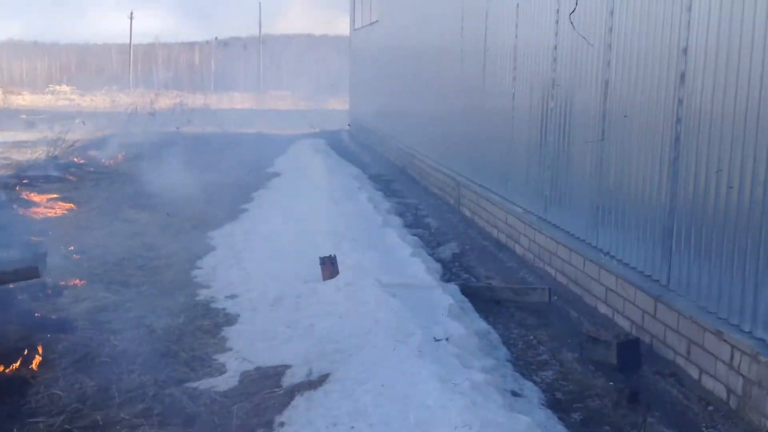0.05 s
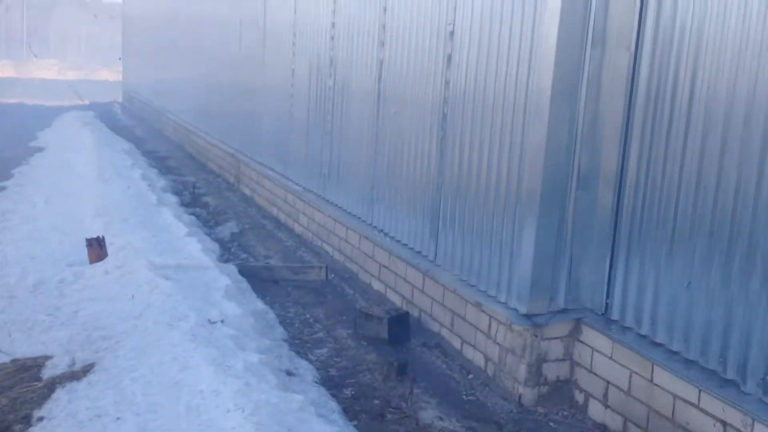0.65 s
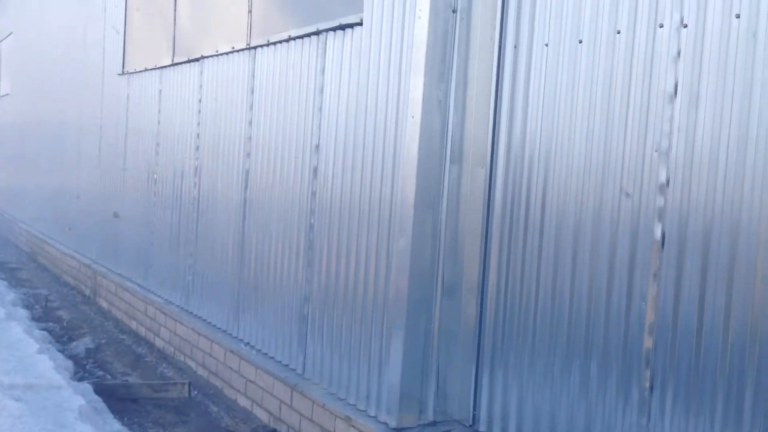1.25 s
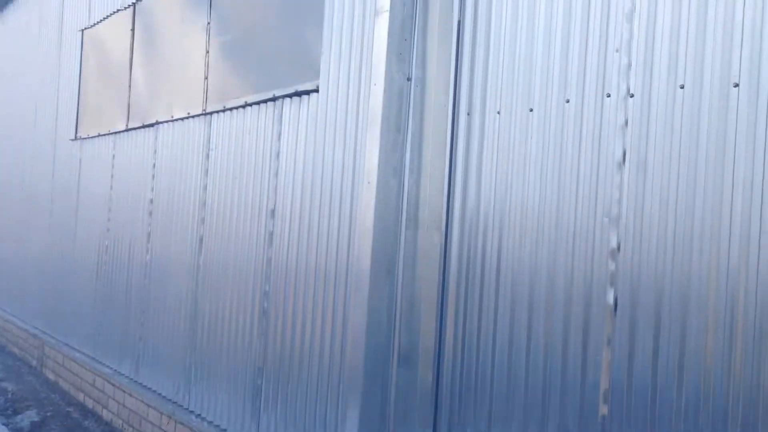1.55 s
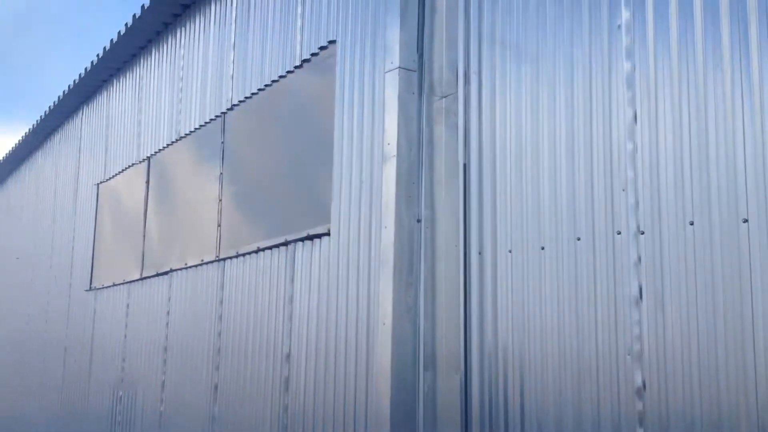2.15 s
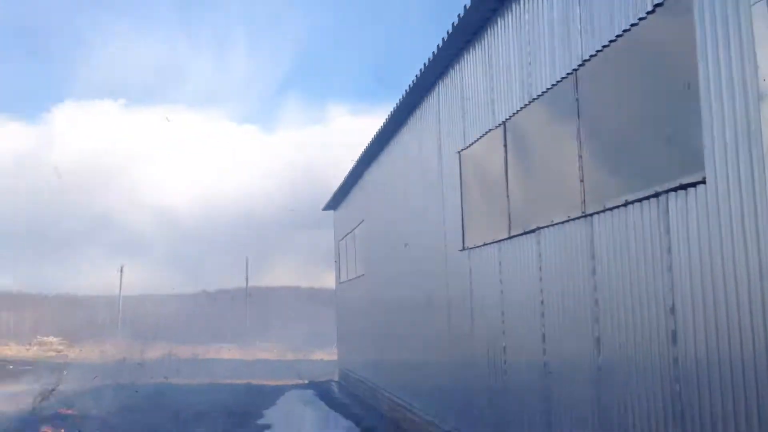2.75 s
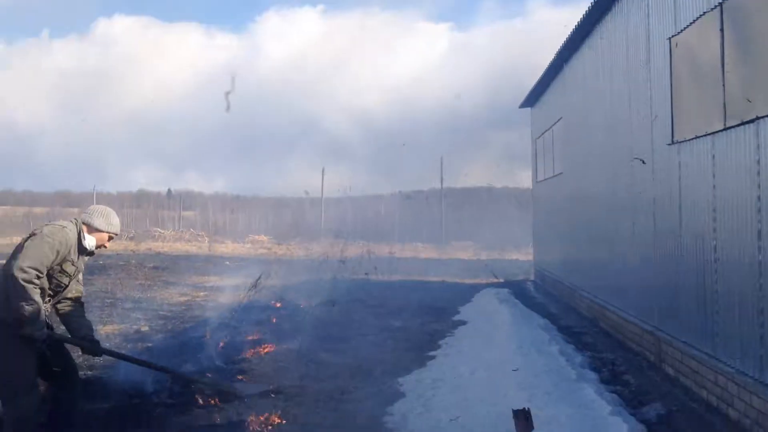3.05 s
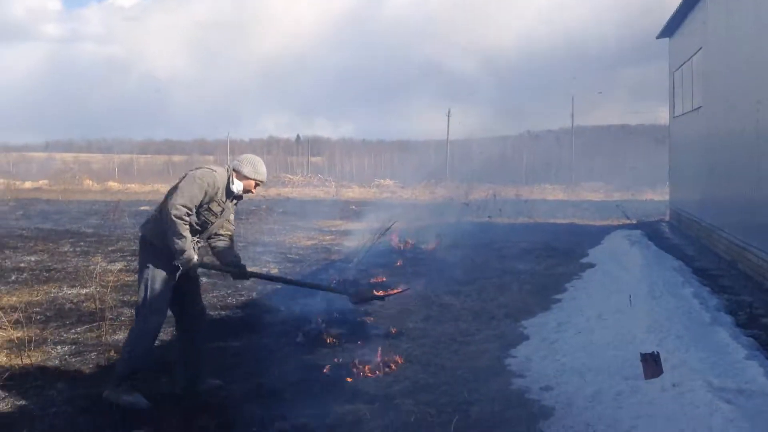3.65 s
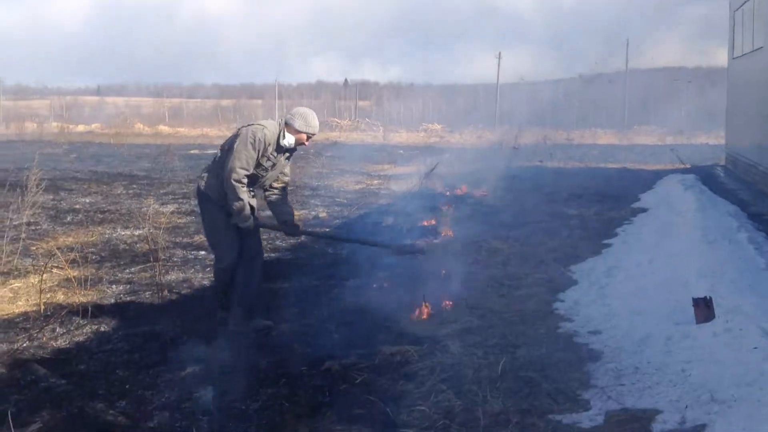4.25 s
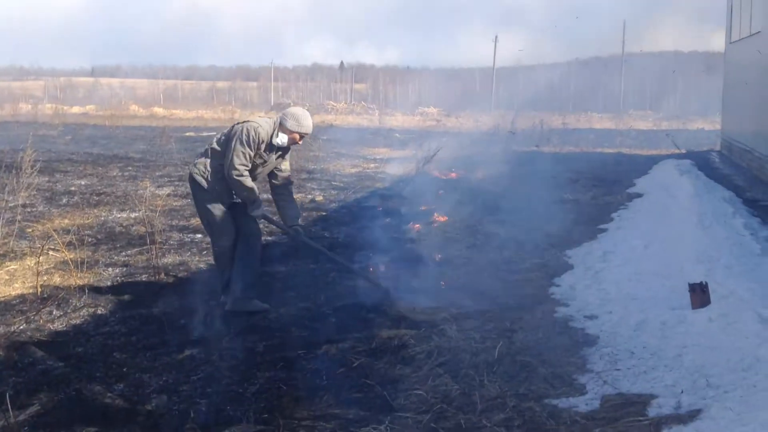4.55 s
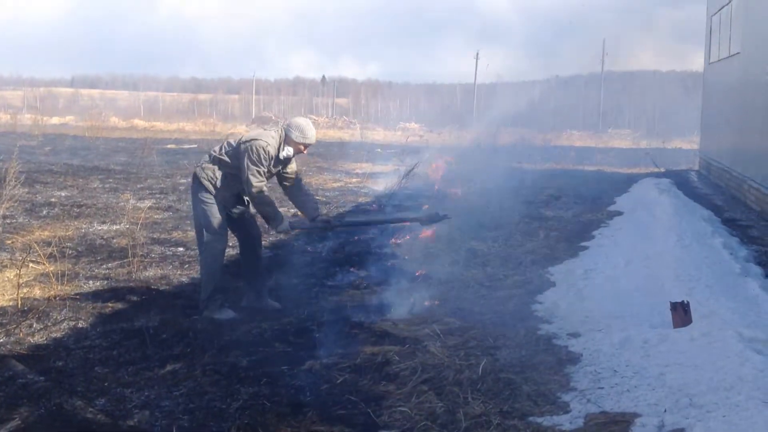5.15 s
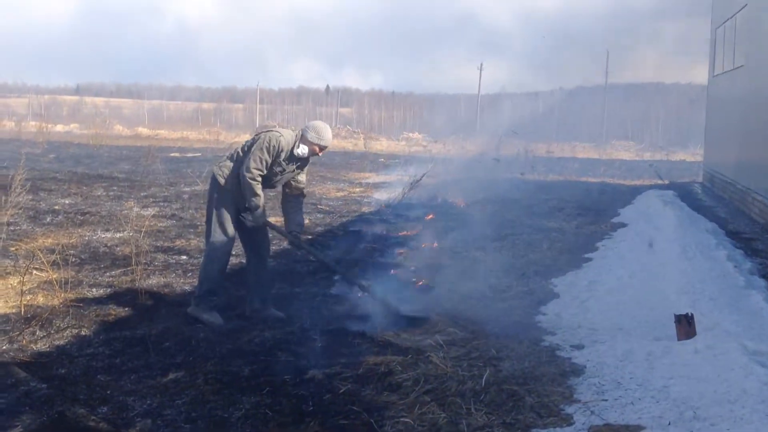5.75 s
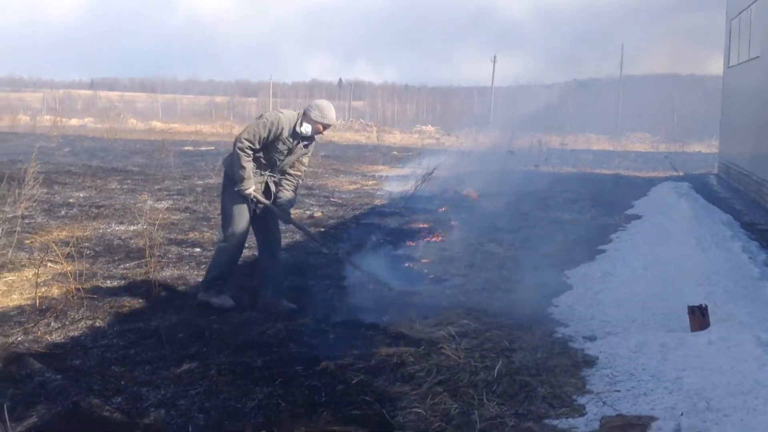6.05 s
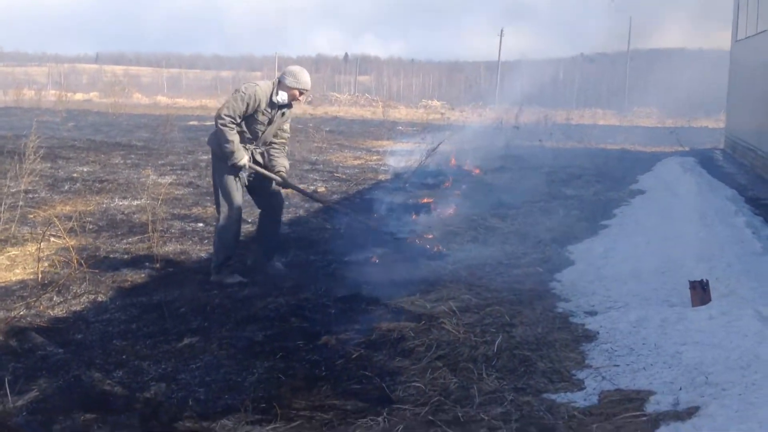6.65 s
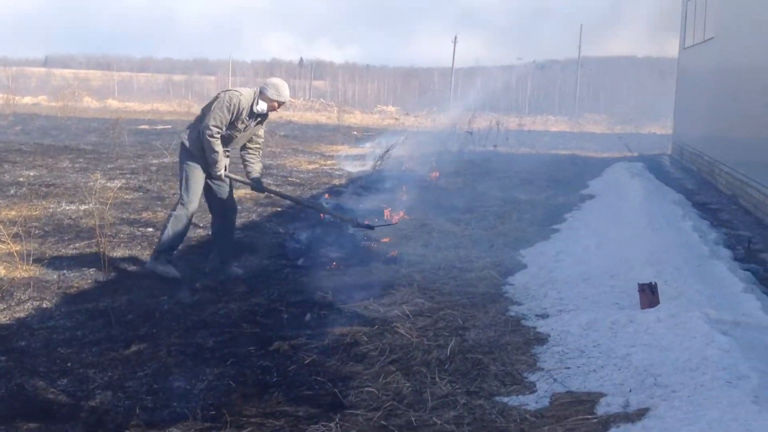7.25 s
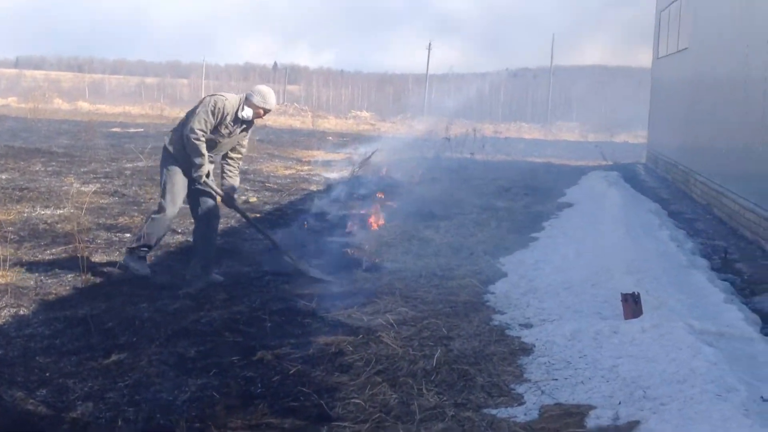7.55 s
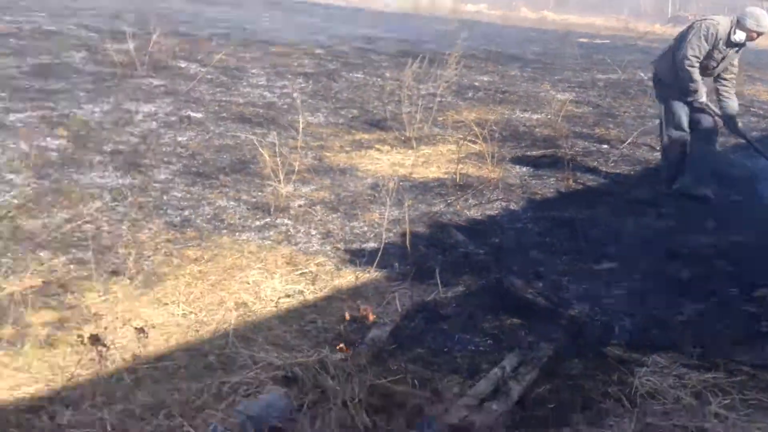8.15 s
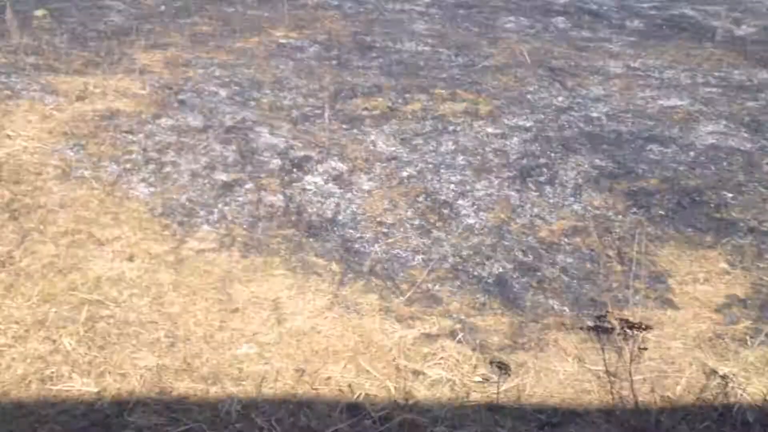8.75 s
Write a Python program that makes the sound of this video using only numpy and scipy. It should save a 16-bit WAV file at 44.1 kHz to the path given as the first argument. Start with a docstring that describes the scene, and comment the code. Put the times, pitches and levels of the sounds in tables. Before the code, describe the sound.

A shovel repeatedly slaps and crunches dry grass outdoors while a small fire crackles and wind rumbles on the microphone.

```python
"""A shovel beats out a grass fire, a few metres away beside a sheet-metal shed.
Each stroke crushes dry stalks, slaps the ground and throws up grit; the steel blade rings,
and the shed wall and the yard echo. The burning grass fizzes as countless thin stems crack,
thicker stems burst with a pop, and gusts of wind rumble on the microphone."""
import sys
import numpy as np
from scipy import signal
from scipy.fft import rfft, irfft
from scipy.io import wavfile
from scipy.ndimage import uniform_filter1d

SR = 44100
rng = np.random.default_rng(int(sys.argv[2]) if len(sys.argv) > 2 else 0)


def to_wav(sig):
    """Store sig (one row per channel, or 1-D mono) as 16-bit WAV at the path in sys.argv[1].

    Samples outside -1..1 are clipped; the rate is SR.
    """
    pcm = np.clip(np.atleast_2d(sig), -1, 1) * 32767
    pcm = np.round(pcm).astype(np.int16)
    wavfile.write(sys.argv[1], SR, pcm.T)  # frames by channels


N = 393372
T = np.arange(N) / SR
EVENT_T = T[:SR * 3 // 5]  # the 0.6 s clock of a single event

# shovel strokes: t/s, slap/dB, thud/dB, note of the trapped air/Hz, grit/dB, leaves/dB, stalks/dB,
# time to pass through the grass/s, time pressed down/s
STROKES = [(.250, -13.5, -28.5, 803, -42, -28.5, -36, 0.015, 0.0033),
           (.700, -19.5, -19, 648, -42.5, -35, -37.5, 0.018, 0.017),
           (1.688, -26.5, -20.5, 860, -38.5, -31, -34, 0.0095, 0.0062),
           (1.965, -22, -23.5, 977, -48, -29, -26, 0.0042, 0.012),
           (2.530, -15.5, -27, 708, -46, -37, -34.5, .010, .014),
           (2.754, -29, -28, 848, -57, -40.5, -43.5, 0.019, 0.016),
           (3.387, -30, -37, 810, -61, -39, -28, 0.045, 0.006),
           (4.045, -20, -22.5, 529, -42.5, -33, -34, 0.014, 0.0032),
           (4.631, -17, -31, 1483, -48, -34.5, -36, 0.017, 0.0032),
           (5.410, -19.5, -25.5, 894, -46.5, -38.5, -36.5, 0.017, 0.015),
           (5.921, -25, -30, 813, -46.5, -37.5, -39, 0.026, 0.004),
           (6.423, -27, -33, 1200, -51.5, -50, -64, 0.016, 0.0077),
           (6.557, -38, -55, 1160, -54, -51, -49.5, 0.063, 0.016),
           (7.133, -24.5, -34, 1378, -43.5, -51, -46.5, 0.028, .014),
           (7.624, -54, -35, 900, -53.5, -39.5, -38.5, .011, 0.0082),
           (8.179, -39.5, -42, 1095, -57, -43, -44, .007, .005),
           (8.618, -36, -42, 1457, -48, -40.5, -41.5, 0.0087, 0.0076)]
# tone colours of a stem's bright tick and of its woody snap: f/Hz, level/dB
TICK_COLOUR = [(300, -1.5), (1500, 1.5), (3500, -17.5), (6000, 5), (7500, -1.5), (10000, -3.5), (12700, -2),
               (14000, 2), (15200, -2)]
SNAP_COLOUR = [(150, -36), (500, -4), (1300, -4), (2200, 1), (3500, -5.5), (6000, -12.5), (15000, -21)]


def shovel_slaps(slap_t60=0.14, thud_t60=0.14, air_t60=0.083, soil_t60=0.46):
    """The blade hits uneven soil in a quick run of contacts; it rings, the ground thuds, grit flies."""
    # the blade's notes, on the soil and lifted: f/Hz, level/dB, t60/s (time to fade by 60 dB)
    damped_notes = [(150, 8, 0.12), (304, -4, 0.3), (544, -2, 0.11), (710, 6.5, 0.14), (802, 7, 0.077),
                    (1090, -19, 0.19), (1215, -11, 0.22), (1396, 10, 0.088), (1578, 6, 0.35),
                    (1810, 2, 0.29), (2027, 16.5, 0.033), (2200, -2, 0.071), (2590, -8, .11)]
    free_notes = [(1475, -3.5, 0.79), (1440, -10, .5), (1500, -2, 0.62), (1790, -6.5, 0.86), (1810, 2, 0.4),
                  (1870, 8, 0.26), (1910, -5, 0.38), (2310, -15, 0.29)]
    # the blade springs off the ground and rings on: t/s, level/dB
    rebounds = [(1.715, -35.5), (2.557, -37.5), (5.438, -45), (7.161, -39)]
    # tone colours of steel on soil, the ground and the flying grit: f/Hz, level/dB
    slap_colour = [(60, -46), (150, -2.5), (300, 1.5), (430, -3.5), (720, 2), (1000, -2.5), (1450, -1.5),
                   (2100, -9), (2900, -14.5), (3700, -24), (8000, -57), (15000, -37)]
    thud_colour = [(30, -33), (70, -41), (125, -1), (220, 1), (330, -0.5), (500, -15), (1200, -10),
                   (5000, -75)]
    grit_colour = [(100, -17), (400, 7), (900, -2.5), (1500, 4), (2000, -3), (3000, -12.5), (4000, -13.5),
                   (6000, -13.5), (8000, -22), (15000, -18)]
    contact, ground, thrown, tones, claps = np.zeros((5, N))
    pressing = np.minimum(EVENT_T / 0.0065, 1)
    lifting = np.minimum(EVENT_T / 0.01, 1)
    on_soil = pressing * envelope(swell=0, hold=0, t60=soil_t60)
    for s, slap_db, thud_db, air_hz, grit_db, *_ in STROKES:
        longer = (920 / air_hz) ** 0.54  # a deeper hollow sounds lower and lasts longer
        add(contact, s, undb(slap_db) * envelope(swell=0.0065, hold=0.0072, t60=longer * slap_t60))
        add(claps, s, undb(slap_db + 4) * air_clap())
        add(ground, s, undb(thud_db) * envelope(swell=0.0013, hold=0.0017, t60=longer * thud_t60))
        add(thrown, s, undb(grit_db) * envelope(swell=0.031, hold=0.05, t60=0.37))
        add(tones, s, undb(slap_db - 3) * on_soil * blade_ring(damped_notes))
        # air caught under the curved blade gives each landing its own hollow note
        add(tones, s, undb(slap_db - 1) * pressing * ping(air_hz, longer * air_t60))
    for s, db in rebounds:
        add(tones, s, undb(db) * lifting * blade_ring(free_notes))
    slap = undb(-6) * colour(contact * grains(per_s=2500, spread_db=1), slap_colour)
    thud = colour(ground * grains(per_s=1500, spread_db=0), thud_colour)
    grit = colour(thrown * splinters(per_s=6000, spread_db=0), grit_colour)
    return claps + slap + thud + grit + tones


def blade_ring(notes, detune=0.01345):
    """The steel rings with several fading notes; each landing shifts their pitch a little."""
    hz, db, t60 = np.transpose(notes)[:, :, None]
    shift, phase = rng.standard_normal((len(notes), 2)).T[:, :, None]
    gain = undb(db)
    waves = np.sin(2 * np.pi * (hz * (1 + detune * shift) * EVENT_T + phase))
    fade = np.exp(-np.log(1000) * EVENT_T / t60)
    return np.sum(gain * waves * fade, axis=0) / np.sqrt(np.sum(gain ** 2) / 2)


def air_clap(width_s=0.000214, bounce_s=0.0034, bounce_db=-3, count=4):
    """Air squeezed out as the blade lands: a sharp pulse, repeated more weakly as the blade chatters."""
    gaps = bounce_s * rng.uniform(0.8, 1.2, count)
    pulses = 0
    for k, s in enumerate(np.cumsum(gaps) - gaps[0] + 5 * width_s):
        offset = (EVENT_T - s) / width_s
        pulses = pulses + undb(k * bounce_db) * (offset ** 2 - 1) * np.exp(-offset ** 2 / 2)
    return pulses


def grass_crunch(twig_db=-7, mass_db=-1, bend_s=0.0021):
    """Dry grass breaks under the load: leaves hiss, stalks rasp, stubble crunches, twigs stand out."""
    # tone colours of the three parts of the grass: f/Hz, level/dB
    leaf_colour = [(1000, -24), (4000, 4), (6500, -31), (7600, -4.5), (9500, -1), (12300, 9), (14000, 2.5),
                   (15300, -14)]
    stalk_colour = [(400, -16), (2000, 3), (3500, -11), (4800, 0), (6200, 4.5), (7300, -12.5), (9500, -9.5),
                    (15000, -12.5)]
    stubble_colour = [(100, -18), (300, 4), (700, -4), (1400, -0.5), (2000, 0), (2750, -2), (3500, -26.5),
                      (6000, -6.5), (15000, -34)]
    leaves, stalks, stubble = np.zeros((3, N))
    for s, swell, hold, leaf_db, stalk_db, stubble_db in grass_touches():
        t60 = 0.093 + 4.9 * hold  # grass pressed for longer takes longer to settle
        load = envelope(swell, hold, t60)
        # the tall leaves are met first, so their sound builds up sooner
        add(leaves, s, undb(leaf_db) * envelope(0.71 * swell, hold, t60))
        add(stalks, s, undb(stalk_db) * load)
        # the low, thick stubble bends before it gives way
        add(stubble, s, undb(stubble_db) * load * np.minimum(EVENT_T / (swell + bend_s), 1))
    mass = undb(mass_db) * splinters(per_s=16000, spread_db=1.5)
    twigs = undb(twig_db) * splinters(per_s=1600, spread_db=3.5)
    hiss = colour(leaves * grains(per_s=11000, spread_db=5), leaf_colour)
    rasp = ground_bounce(colour(stalks * (mass + twigs), stalk_colour))
    crunch = colour(stubble * grains(per_s=4000, spread_db=2.5), stubble_colour)
    return hiss + rasp + crunch


def grass_touches(rustle_swell_s=0.0033):
    """Every touch of the grass: t/s, swell/s, hold/s, leaves/dB, stalks/dB, stubble/dB."""
    # a boot or the dragged blade brushes the grass: t/s, level/dB, time pressed down/s
    rustles = [(0.468, -53, 0.0045), (.507, -47.5, .010), (2.131, -38, 0.0095), (2.628, -45.5, 0.032),
               (4.883, -58, 0.041), (5.619, -47, 0.019), (6.158, -51.5, 0.024), (6.368, -46, 0.027),
               (7.183, -48, 0.0064)]
    for s, slap_db, _, _, _, leaf_db, stalk_db, passing_s, press_s in STROKES:
        stubble_db = max(stalk_db + 4, slap_db - 15.5)  # it breaks with the stalks or under the slap
        yield s - passing_s, 0.94 * passing_s, press_s, leaf_db, stalk_db, stubble_db
    for s, db, press_s in rustles:
        yield s, rustle_swell_s, press_s, db - 6, db, db - 3.5


def ground_bounce(x, lag_s=0.000888, wander=0.22, bounce_db=-5):
    """An echo off the soil; its delay shifts as the blade moves, for a hollow, sliding sound."""
    delay_s = lag_s * np.exp(wander * drift(12))
    echo = np.interp(T - delay_s, T, x)
    return (x + undb(bounce_db) * echo) / np.sqrt(1 + undb(bounce_db) ** 2)


def stem_pops(ring_t60=0.0059, middle_hz=5000):
    """Burning stems split with a tick, a snap and a short ring, longer in the thick, low ones."""
    # the loudest stems that burst: t/s, crack/dB, f/Hz, ring/dB
    loud_pops = [(.073, -33, 13300, -29), (.108, -38, 13500, -33), (.466, -28, 13300, -31),
                 (.864, -33, 6600, -36), (1.094, -48, 5730, -31), (3.336, -32, 5200, -39),
                 (3.521, -36, 12800, -31), (3.721, -28.5, 14400, -35), (4.165, -25, 12600, -29),
                 (4.228, -36, 2320, -37), (4.986, -38, 1540, -33.5), (5.174, -35, 5970, -32),
                 (5.361, -32.5, 12600, -37), (5.620, -30, 5300, -30), (5.631, -43, 5840, -26),
                 (5.849, -29, 12300, -41), (6.009, -29, 13000, -23), (6.086, -41, 4000, -37),
                 (6.168, -50, 6200, -27.5), (6.339, -40, 7300, -44), (6.361, -16.5, 4000, -46),
                 (6.374, -30, 5050, -26), (6.561, -29, 2740, -30), (6.752, -29.5, 12700, -25),
                 (6.813, -42, 2100, -41), (6.863, -35, 13000, -40), (7.006, -39, 2220, -34),
                 (7.020, -34, 12800, -42), (7.070, -34.5, 2110, -35), (7.095, -30, 12400, -40),
                 (7.651, -24, 1460, -21), (7.876, -27.5, 1450, -31), (7.956, -29, 2060, -30.5),
                 (8.030, -36, 2200, -53), (8.073, -29.5, 1290, -32), (8.235, -33, 5500, -28.5),
                 (8.443, -33, 2120, -47), (8.494, -33, 12100, -33), (8.562, -37, 12700, -26),
                 (8.613, -39, 10700, -18.5), (8.865, -31, 10900, -20.5)]
    out = np.zeros(N)
    for s, db, hz, ring_db in loud_pops + small_pops():
        thinness = np.log2(hz / middle_hz)  # in octaves: thin stems tick, thick ones snap
        tick = undb(db - 1.5 + 0.7 * thinness) * crack(TICK_COLOUR, scatter=0.28, t60=0.027)
        snap = undb(db - 2.5 - 4 * thinness) * crack(SNAP_COLOUR, scatter=0.18, t60=0.014)
        ring = undb(ring_db) * ping(hz, ring_t60 * np.sqrt(middle_hz / hz))
        add(out, s, tick + snap + ring)
    return out


def small_pops(per_s=4, quietest_db=-46, spread_db=2.5, thinnest_hz=13500, octaves=2.8):
    """Lesser stems, mostly thin ones, burst at random: t/s, crack/dB, f/Hz, ring/dB."""
    when, size, thickness = rng.random((int(per_s * N / SR), 3)).T
    db = quietest_db - spread_db * np.log(np.maximum(size, np.exp(-2)))
    hz = thinnest_hz / 2 ** (octaves * thickness ** 2)
    return list(zip(when * T[-1], db, hz, db + 3))


def crack(tone_colour, scatter, t60):
    """One sharp crack, scattered among the stems; its peak is 1."""
    push = scatter * rng.standard_normal(len(EVENT_T)) * envelope(swell=0, hold=0, t60=t60)
    push[0] = 1
    sound = colour(push, tone_colour)
    return sound / np.max(np.abs(sound))


def fire(fizz_db=1, tick_db=-10, crack_db=-8, woody_db=-1, flare_db=2):
    """Countless thin blades of grass fizz in the flames, with flurries of ticks and small cracks."""
    # how strongly the grass burns: t/s, level/dB
    burn_levels = [(0, -53.5), (.3, -54), (1.04, -58), (2, -54.5), (2.55, -56), (3.7, -56.5), (4.17, -53.5),
                   (4.6, -57), (4.85, -54.5), (5.35, -58.5), (6.04, -53.5), (6.25, -56.5), (7.03, -54),
                   (7.22, -57), (7.77, -53), (8.1, -56), (8.7, -50.5), (8.92, -53)]
    # tone colour of the fizz: f/Hz, level/dB
    fizz_colour = [(290, -35), (500, 2), (927, -1.5), (1530, -1), (1880, 1), (3580, -7), (5750, -3.5),
                   (6450, -3), (7130, -8.5), (10100, -10.5), (11600, -6.5), (13000, -6), (14600, -12),
                   (15500, -9)]
    strength = undb(np.interp(T, *np.transpose(burn_levels)) + 0.18 * drift(7.5))
    flurry = undb(flare_db * drift(16))
    fizz = undb(fizz_db) * colour(splinters(per_s=16000, spread_db=3), fizz_colour)
    ticks = undb(tick_db) * splinters(per_s=700, spread_db=2.5)
    cracks = undb(crack_db) * grains(per_s=55, spread_db=3)
    # a thicker stem gives its tick and its woody snap at the same instant
    crackle = colour(ticks + cracks / 2, TICK_COLOUR) + undb(woody_db) * colour(cracks, SNAP_COLOUR)
    return strength * (fizz + flurry * crackle)


def wind(rumble_db=-3, flutter_db=2, hard_db=-7, strong_db=-33):
    """Air swirls at the microphone; stronger wind makes smaller swirls that sound higher."""
    # tone colours of soft and hard swirls: f/Hz, level/dB
    soft_colour = [(25, -55), (50, -24), (80, -14), (125, -1.5), (180, 2), (280, -4.5), (400, -9.5),
                   (600, -26), (1200, -61), (5000, -79)]
    hard_colour = [(30, -36), (80, -33.5), (150, 8.5), (280, 0.5), (450, -12.5), (650, -17), (1000, -33.5),
                   (4000, -55)]
    # the hardest swirls that hit the microphone: t/s, level/dB, length/s
    buffets = [(0.036, -38, 0.014), (0.107, -32, 0.023), (0.153, -31.5, .065), (0.186, -31, 0.018),
               (0.64, -44, 0.015), (2.101, -38.5, 0.021), (2.368, -24, 0.028), (2.422, -35, 0.023),
               (2.865, -30, .024), (2.97, -28.5, 0.021), (3.082, -37.5, .017), (3.616, -34.5, .022),
               (3.637, -37, 0.03), (3.673, -35.5, 0.016), (7.49, -40, 0.016), (7.55, -35.5, 0.02),
               (7.936, -36.5, 0.015), (8.709, -36, 0.023)]
    flow_db = wind_level() + flutter_db * drift(45)
    rumble = undb(flow_db + rumble_db) * colour(rng.standard_normal(N), soft_colour)
    swirls = colour(rng.standard_normal(N), hard_colour)
    calm_db = 0.5 * np.minimum(flow_db - strong_db, 0)  # hard swirls fade faster as the wind drops
    out = rumble + undb(flow_db + hard_db + calm_db) * swirls
    for s, db, length in buffets:
        inside = np.abs(T - s) < length / 2
        add(out, s - length / 2, undb(db) * unit(swirls[inside] * np.hanning(inside.sum())))
    return out


def wind_level(breeze_db=-51.5, wander_db=2):
    """The wind's level in dB: gusts swell and fade over a light, wandering breeze."""
    # gusts at their peak: t/s, level/dB, half length/s
    gusts = [(0.146, -32.5, 0.042), (0.388, -37.5, 0.1), (.73, -41, 0.082), (1.146, -50.5, .04),
             (1.614, -41, 0.08), (1.797, -39, .11), (2.189, -31.5, 0.055), (2.41, -32, 0.12),
             (2.81, -33.5, 0.2), (3.65, -38, 0.065), (4.415, -49.5, 0.08), (4.983, -46.5, 0.015),
             (6.02, -53.5, 0.042), (6.39, -44.5, .035), (7.52, -42, 0.066), (7.77, -42, 0.032),
             (8.52, -40.5, 0.045), (8.685, -37.5, 0.099)]
    power = undb(breeze_db + wander_db * drift(8.8)) ** 2
    for s, db, half in gusts:
        power = power + (undb(db) * np.exp(-((T - s) / half) ** 2 / 2)) ** 2
    return 10 * np.log10(power)


def yard_echo(x, wall_s=0.011, wall_db=-18, tail_t60=0.99, tail_db=-28, dull_hz=5000):
    """The shed wall sends back a quick echo, and the yard adds a faint, dull tail."""
    tail = rng.standard_normal(len(EVENT_T)) * envelope(swell=0.093, hold=0, t60=tail_t60)
    tail /= np.sqrt(np.sum(tail ** 2))
    tail = signal.sosfilt(signal.butter(1, dull_hz, fs=SR, output="sos"), tail)
    out = x + undb(tail_db) * signal.fftconvolve(x, tail)[:N]
    add(out, wall_s, undb(wall_db) * x)
    return out


def grains(per_s, spread_db):
    """Tiny breaks click at random moments; more spread makes a few stand out."""
    when, rarity, side = rng.random((int(per_s * N / SR), 3)).T
    size = undb(-spread_db * np.log(np.maximum(rarity, np.exp(-5)))) * np.sign(side - 0.5)
    return unit(np.bincount((when * N).astype(int), size, N))


def splinters(per_s, spread_db):
    """Stems of every thickness break, each ringing briefly in its own range of pitch."""
    edges_hz = [250, 900, 1700, 2700, 4000, 5200, 6400, 8000, 10000, 12000, 13600, 15500]
    bands = [signal.butter(2, pair, "bandpass", fs=SR, output="sos")
             for pair in zip(edges_hz, edges_hz[1:])]
    return unit(sum(signal.sosfilt(band, grains(per_s / len(bands), spread_db)) for band in bands))


def ping(hz, t60):
    """One fading note."""
    return np.sin(2 * np.pi * hz * EVENT_T) * np.exp(-np.log(1000) * EVENT_T / t60)


def envelope(swell, hold, t60):
    """Swell, stay, then die away; all times in seconds."""
    rise = np.minimum(EVENT_T / max(swell, 1 / SR), 1) ** 2
    return rise * np.exp(-np.log(1000) * np.maximum(EVENT_T - swell - hold, 0) / t60)


def colour(x, points, size=4096):
    """Give x a tone colour (f/Hz, level/dB); only the differences between the levels count."""
    hz, db = np.transpose(points)
    bins_hz = np.maximum(np.arange(size // 2 + 1) * SR / size, 1)
    gain = undb(np.interp(np.log(bins_hz), np.log(hz), db))
    # folding the cepstrum makes the filter ring only after a hit, never before it
    cepstrum = irfft(np.log(gain))
    cepstrum[1:size // 2] *= 2
    cepstrum[size // 2 + 1:] = 0
    response = irfft(np.exp(rfft(cepstrum)))[:size // 2]
    return signal.fftconvolve(x, response / np.sqrt(np.sum(response ** 2)))[:len(x)]


def drift(per_s):
    """A smooth random wobble of size about 1, with per_s new values a second."""
    step = int(SR / per_s)
    stairs = np.repeat(rng.standard_normal(N // step + 1), step)
    return unit(uniform_filter1d(uniform_filter1d(stairs, step), step)[:N])


def undb(db):
    """Turn decibels into a gain."""
    return 10 ** (np.asarray(db) / 20)


def unit(x):
    """Scale x to an average (rms) level of 1."""
    return x / np.sqrt(np.mean(x ** 2))


def add(out, s, x):
    """Mix x into out from time s on."""
    i = max(int(s * SR), 0)
    out[i:i + len(x)] += x[:N - i]


def scene():
    """Shovel strokes in the yard, the fire close by, wind on the microphone."""
    return (yard_echo(shovel_slaps() + grass_crunch()) + stem_pops() + fire() + wind())[None]


def record(dry, top_hz=15400):
    """The recorder cuts off the highest treble."""
    return signal.sosfilt(signal.ellip(10, 0.2, 70, top_hz, fs=SR, output="sos"), dry)


dry = scene()
out = record(dry)
to_wav(out)
```